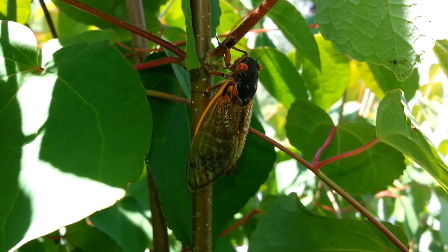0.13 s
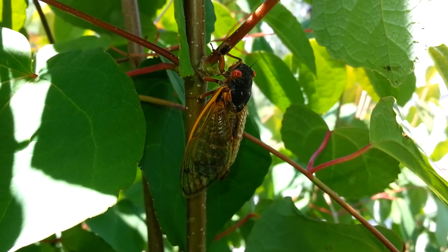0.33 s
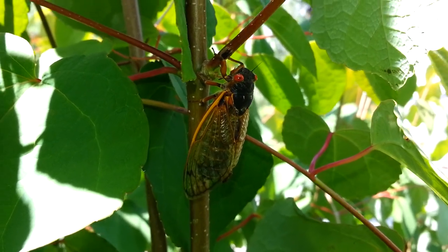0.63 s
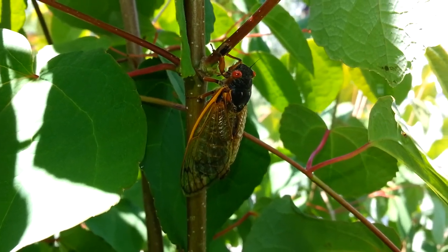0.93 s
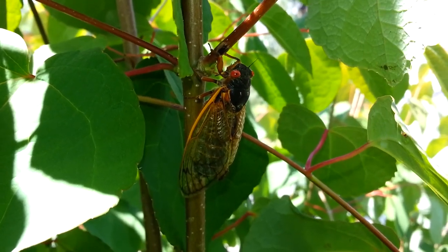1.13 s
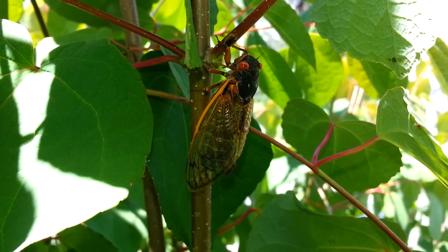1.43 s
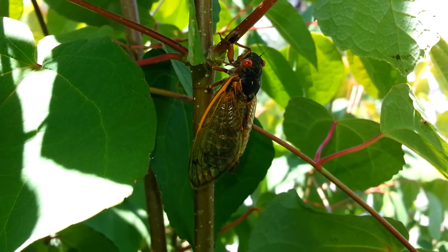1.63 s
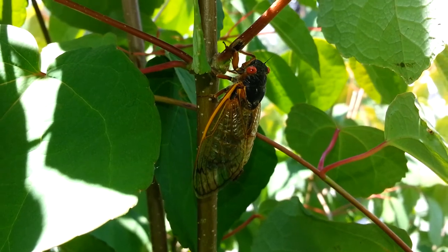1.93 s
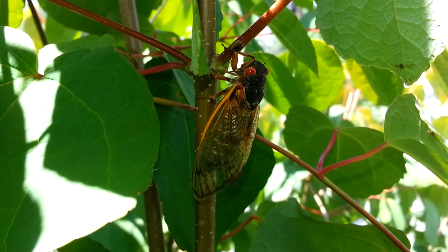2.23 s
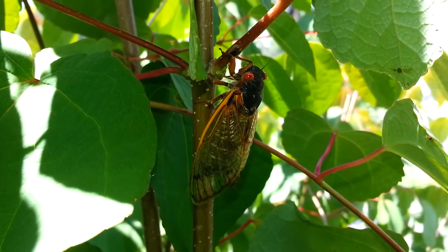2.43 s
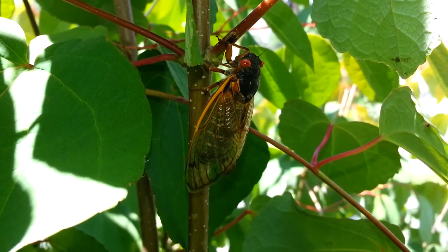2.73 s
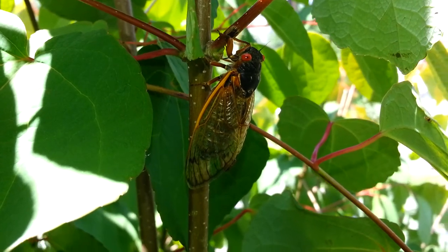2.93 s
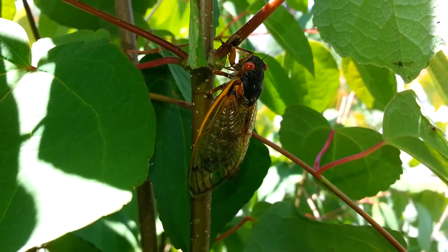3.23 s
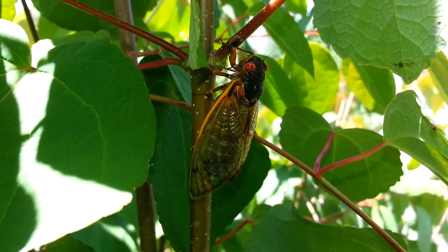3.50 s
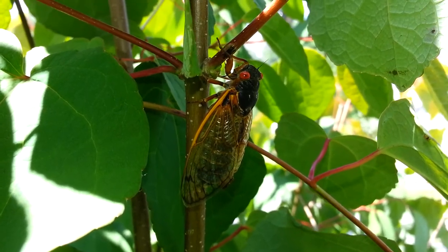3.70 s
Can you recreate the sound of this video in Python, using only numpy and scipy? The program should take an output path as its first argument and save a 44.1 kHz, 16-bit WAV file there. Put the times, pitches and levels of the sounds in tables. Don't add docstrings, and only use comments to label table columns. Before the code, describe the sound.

A close cicada holds a loud, tonal, rattling buzz, slides down in pitch and stops; after a second of faint distant chorus it abruptly buzzes again, outdoors among leaves, captured by a nearby phone in stereo.

```python
import sys
import numpy as np
from scipy import signal
from scipy.fft import rfft, irfft, next_fast_len
from scipy.io import wavfile
from scipy.ndimage import uniform_filter1d, map_coordinates

SR = 44100
rng = np.random.default_rng(int(sys.argv[2]) if len(sys.argv) > 2 else 0)


def to_wav(s):
    ch = np.atleast_2d(s).T
    pcm = np.round(np.clip(ch, -1, 1) * 32767)
    wavfile.write(sys.argv[1], SR, pcm.astype(np.int16))


def boost_factor(decibels):
    exponent = np.asarray(decibels, float) / 20
    return 10 ** exponent


N = 170226
STOP_S, START_S = 2.262, 3.316
STROKES = 1000

# time_s, pitch_hz, strokes_per_s, phase_slip_rad (per stroke)
STROKE_PATH = [(0, 1308, 162, .55), (.9, 1314, 164.5, .55), (1.84, 1312, 165, .55), (1.88, 1245, 167, .5),
               (1.92, 1055, 171, .45), (1.96, 922, 174, .35), (2.01, 858, 176, .3), (2.15, 846, 176, .28),
               (2.26, 858, 174, .3), (3.318, 1245, 166, .25), (3.345, 1270, 165, .2),
               (3.385, 1278, 163, .25), (3.42, 1308, 161, .5), (3.86, 1312, 158, .55)]
# time_s, level_db, rattle_db, tymbal_db
EFFORT = [(0, -19.5, -44, -52.5), (.9, -20, -43, -51), (1.84, -19.5, -43.5, -52), (1.9, -21, -47.5, -49),
          (1.96, -25, -48, -46.5), (2.03, -26.5, -48.5, -44), (2.26, -29, -49, -46),
          (3.318, -19.5, -43.5, -42), (3.345, -16, -40, -50), (3.4, -18.5, -41, -47),
          (3.48, -19.5, -43, -52.5), (3.86, -19.5, -43, -54)]
# multiple (of pitch), level_db
OVERTONES = [(2, -37), (3, -32.5), (4, -40.5), (5, -51)]
# freq_hz, level_db (per Hz)
RATTLE_COLOUR = [(1500, 8.5), (2200, -2), (3200, -8.5), (4600, -3.5), (7000, -4), (9500, -8),
                 (12000, -14.5), (14400, -16)]
# freq_hz, width_hz, level_db
SHELL = [
    [(1770, 25, 6), (2620, 120, 11), (3700, 430, 11.5), (5340, 290, 0.5), (6370, 410, -20),
     (8020, 210, 6.5), (8350, 280, 10.5), (10660, 500, 11)],
    [(1828, 22, 8), (2750, 240, 8), (3667, 190, 14), (3200, 270, -3.5), (6320, 200, -5.5), (8270, 300, 4.5),
     (9050, 420, 7.5), (10900, 160, 1.5)],
]
# freq_hz, share (0 to 1)
RATTLE_SHARED = [(2000, 0.61), (4000, 0.82), (8000, 0.59), (13000, .55)]
# freq_hz, width_hz, level_db
TYMBAL_PLATES = [
    (4230, 480, 1.5),
    (3400, 1000, -8.5),
]
# freq_hz, level_db
LEFT_OVER_RIGHT = [(500, -2.2), (1300, -1.5), (2600, -2), (5000, -1.5), (8000, -10), (13000, -15.5)]
# freq_hz, level_db (per Hz)
DRONE = [(350, -13), (600, -25.5), (655, -28), (859, -16), (1100, -10), (1340, 4.5), (1410, -0.5),
         (1600, -17.5), (2200, -40), (2860, -65), (4840, -120)]
# freq_hz, level_db (per Hz)
HIGH_CHORUS = [(3600, -10), (4800, -6), (5400, 12), (5900, -1), (6500, -35)]
# time_s, level_db
HIGH_SWELL = [
    (0, -60),
    (2.6, -75),
    (3.0, -69),
    (3.3, -55.5),
    (3.86, -74),
]
# freq_hz, level_db (per Hz)
RUMBLE = [(15, -67), (25, -37), (38, -24), (81, -3), (161, -0.5), (289, -0.5), (379, -8.5), (413, -10.5),
          (750, -7.5), (980, -41), (1650, -120)]
# freq_hz, level_db (per Hz)
HISS = [(1120, -38), (1900, -2), (2370, -2), (3580, -7), (5100, -6.5), (6140, -10.5), (6960, -18),
        (7580, -13.5), (14300, -21)]
# freq_hz, likeness (-1 to 1)
LIKENESS = [(60, 0.93), (180, 0.88), (530, 0.6), (1570, -0.24), (4650, 0.042), (13800, -0.2)]
# freq_hz, level_db
WHINES = [
    (384, -71),
    (14000, -70),
]
# freq_hz, dip_db
DROP_BELOW = [(2500, -9), (5600, -5), (6500, -3), (8000, -4.5), (10300, -2.2), (12000, -1), (14000, .3)]


def unit(x):
    return x / np.sqrt(np.mean(np.abs(x) ** 2) + 1e-20)


def along(points, hz):
    f, v = np.transpose(points)
    return np.interp(np.log(hz + 1), np.log(f + 1), v)


def curves(rows):
    s, *cols = np.transpose(rows)
    return [np.interp(np.arange(N) / SR, s, c) for c in cols]


def wobble(rate):
    knots = rng.standard_normal(int(N * rate / SR) + 4)
    return map_coordinates(knots, [np.arange(N) * rate / SR])


def filtered(x, response):
    m = next_fast_len(N + SR // 2)
    return irfft(rfft(x, m) * response(np.fft.rfftfreq(m, 1 / SR)), m)[..., :N]


def singing():
    release_s, attack_s = .0028, .0045
    t = np.arange(N) / SR
    first = np.clip((STOP_S - t) / release_s + .5, 0, 1)
    return first + np.clip((t - START_S) / attack_s, 0, 1)


def tymbal_strokes():
    hz, rate, slip = curves(STROKE_PATH)
    count = np.cumsum(rate * (1 + .025 * wobble(25))) / SR + 4
    index = np.arange(STROKES)
    slips = np.interp(index, count, slip)
    age = np.arange(N) / SR - START_S
    fresh = (age > 0) * np.exp(-np.abs(age) / .12)
    lean = .2 - 4 * (1 - hz / hz.max()) + .9 * fresh
    jumping = rng.random(STROKES) < .15 * slips / slips.max()
    jumps = -1.6 * np.abs(rng.standard_normal(STROKES)) * jumping
    drift = slips * rng.standard_normal(STROKES) + jumps + np.interp(index, count, lean)
    turn = np.cumsum(drift) + 1.55 * slips * rng.standard_normal(STROKES)
    carrier_hz = 1.01 * hz * (1 + .004 * wobble(12)) - lean * rate / (2 * np.pi)
    return count, turn, 2 * np.pi * np.cumsum(carrier_hz) / SR


def abdomen(count, turn, phase):
    stroke, part = count.astype(int), count % 1
    weak_side_db = -.8 * (np.arange(STROKES) % 2)
    size = boost_factor(1.3 * rng.standard_normal(STROKES) + weak_side_db)

    def shape(u):
        return (1 - np.exp(-(u / .3) ** 2)) * np.exp(-u / 1.0)

    def ring(multiple):
        total = 0
        for k in range(5):
            hit = stroke - k
            total = total + size[hit] * shape(part + k) * np.sin(multiple * (phase + turn[hit]))
        return unit(total)

    tone = ring(0.98)
    power = np.abs(uniform_filter1d(tone ** 2, round(.012 * SR)))
    tone = unit(tone / (power + .05) ** (.65 / 2))
    return tone + sum(boost_factor(db) * ring(multiple) for multiple, db in OVERTONES)


def rib_clicks(count, phase):
    pair_db = -2.5 * np.cos(np.pi * count)
    stroke_db = 4 * np.cos(2 * np.pi * count) / 2
    gate = boost_factor(pair_db + stroke_db + 6 * np.cos(phase))
    return singing() * unit(gate) * rng.standard_normal((4, N))


def rib_rattle(clicks):
    def colour(f):
        bumps = [sum(db * np.exp(-((f - c) / w) ** 2) for c, w, db in port) for port in SHELL]
        return boost_factor(along(RATTLE_COLOUR, f) + np.array(bumps)) * (f > 1500)

    def share(f):
        return np.clip(along(RATTLE_SHARED, f), 0, 1)

    common = filtered(clicks[0], lambda f: colour(f) * np.sqrt(share(f)))
    own = filtered(clicks[1:3], lambda f: colour(f) * np.sqrt(1 - share(f)))
    return unit(common + own)


def tymbal_ring(click):
    def plate(f):
        return sum(boost_factor(db) * (1j * f * w / (c * c - f * f + 1j * f * w)) ** 2 for c, w, db in TYMBAL_PLATES)
    return unit(filtered(click, plate))


def cicada():
    level_db, rattle_db, tymbal_db = curves(EFFORT)
    count, turn, phase = tymbal_strokes()
    body = singing() * boost_factor(level_db) * abdomen(count, turn, phase)
    clicks = rib_clicks(count, phase)
    return body + boost_factor(rattle_db) * rib_rattle(clicks) + boost_factor(tymbal_db) * tymbal_ring(clicks[3])


def at_ports(x):
    lag_s = .000159
    side = np.array([[1], [-1]])

    def path(f):
        return boost_factor(side * along(LEFT_OVER_RIGHT, f) / 2) * np.exp(-1j * np.pi * side * f * lag_s)
    return filtered(x, path)


def rush(spectrum, patchy_db):
    z = signal.stft(rng.standard_normal((2, N)), nperseg=512)[2]
    field = uniform_filter1d(rng.standard_normal(z.shape[1:]), size=4, axis=0)
    field = uniform_filter1d(field, size=10, axis=1)
    pair = signal.istft(z * boost_factor(patchy_db * unit(field)), nperseg=512)[1][:, :N]
    shut = [(spectrum[0][0] * .8, -90)] + list(spectrum) + [(spectrum[-1][0] * 1.2, -90)]

    def mid_side(f):
        turn = np.arccos(np.clip(along(LIKENESS, f), -1, 1)) / 2
        return boost_factor(along(shut, f)) * [np.cos(turn), np.sin(turn)]

    mid, side = filtered(pair, mid_side)
    return np.array([mid + side, mid - side]) / np.sqrt(np.mean(mid ** 2))


def far_chorus():
    return boost_factor(-34.5 + wobble(2.85)) * rush(DRONE, patchy_db=1)


def high_chorus():
    return boost_factor(curves(HIGH_SWELL)[0]) * rush(HIGH_CHORUS, patchy_db=-1.5)


def rumble_and_hiss():
    return boost_factor(-49) * rush(RUMBLE, patchy_db=1.44) + boost_factor(-52) * rush(HISS, patchy_db=1.64)


def thin_whines():
    t = np.arange(N) / SR
    total = 0
    for hz, db in WHINES:
        level = boost_factor(db + 0.53 * wobble(5.4))
        total = total + level * np.sin(2 * np.pi * hz * t + 0.2 * wobble(10))
    return total


def background():
    return far_chorus() + high_chorus() + rumble_and_hiss() + thin_whines()


def scene():
    song = cicada()
    loud = np.abs(uniform_filter1d(song[0] ** 2, round(.12 * SR), mode="nearest"))
    duck = boost_factor(-1.5 * np.clip(loud / np.median(loud), 0, 1.5))
    return at_ports(song) + duck * background()


def thinned_treble(x):
    hz, _, z = signal.stft(x, SR, nperseg=2048)
    power = np.abs(z[:, :1024]) ** 2
    bands = power.reshape(2, 128, 8, -1).mean(axis=2) + 1e-20
    level_db = uniform_filter1d(10 * np.log10(bands), size=2, axis=2)
    near_pitch_db = uniform_filter1d(level_db, size=7, axis=1)
    near_time_db = uniform_filter1d(level_db, size=9, axis=2) + 1.5
    dip_db = level_db - np.minimum(near_pitch_db, near_time_db)
    limit_db = along([(2000, -99)] + list(DROP_BELOW), hz[4:1024:8])
    keep = np.repeat(dip_db > limit_db[:, None], 8, axis=1)
    kept = z * np.pad(keep, ((0, 0), (0, 1), (0, 0)))
    return signal.istft(kept, SR, nperseg=2048)[1][:, :N]


def roll_off(x):
    return signal.sosfilt(signal.butter(12, 14410, fs=SR, output="sos"), x)


def record(dry):
    mix = thinned_treble(dry)
    return roll_off(mix)


dry = scene()
out = record(dry)
to_wav(out)
```